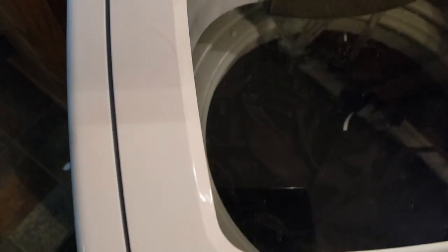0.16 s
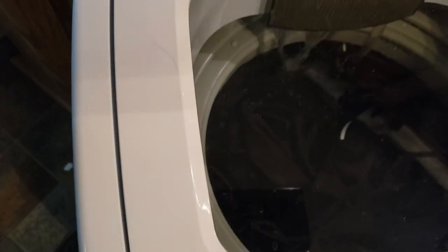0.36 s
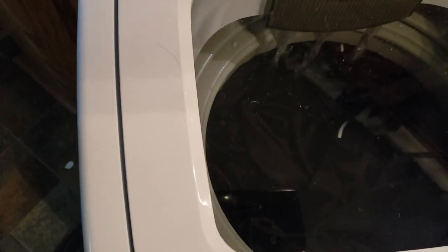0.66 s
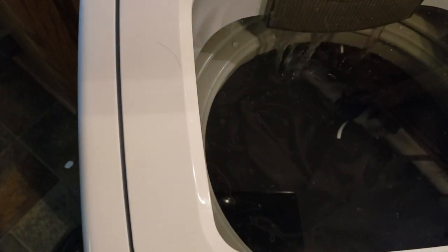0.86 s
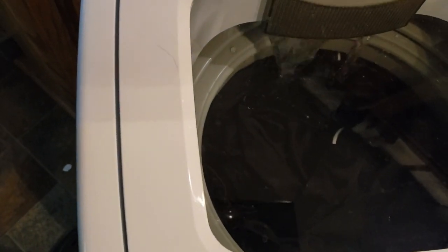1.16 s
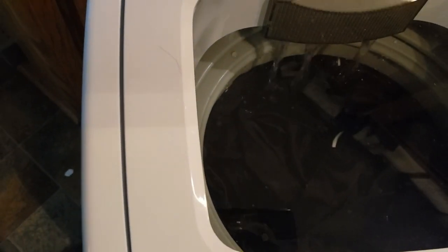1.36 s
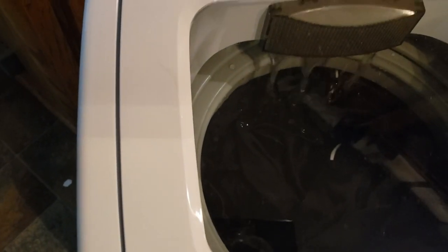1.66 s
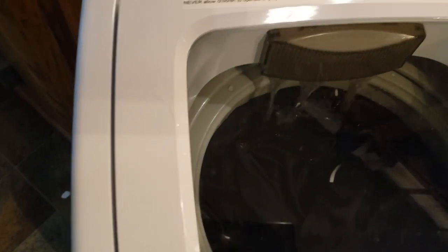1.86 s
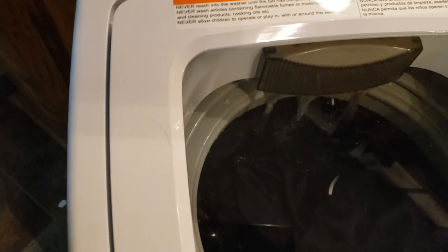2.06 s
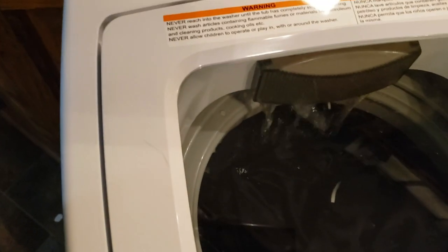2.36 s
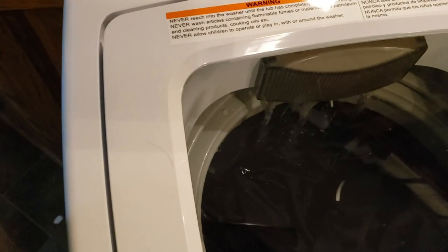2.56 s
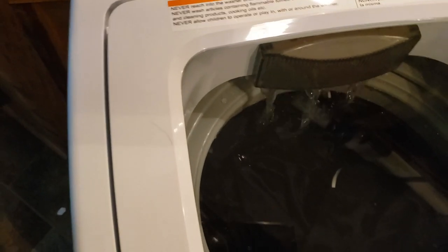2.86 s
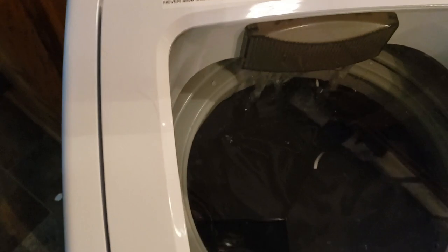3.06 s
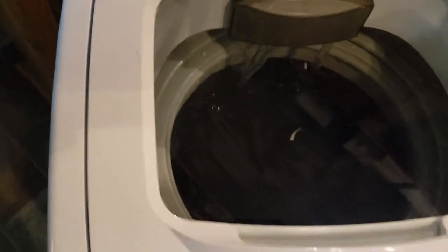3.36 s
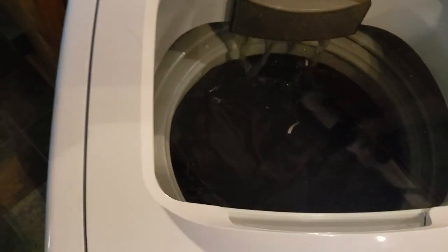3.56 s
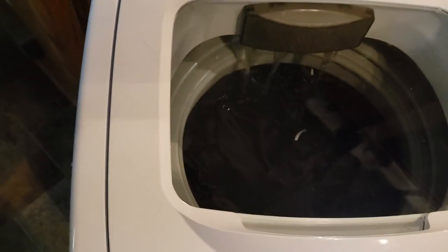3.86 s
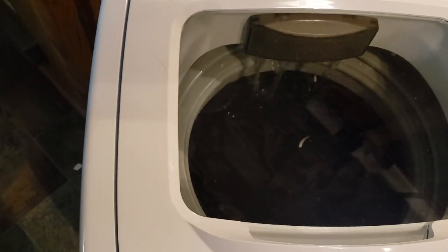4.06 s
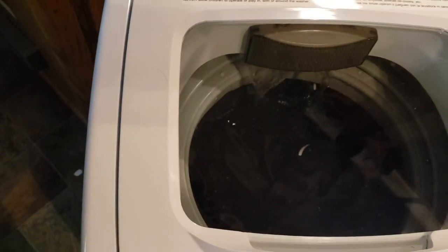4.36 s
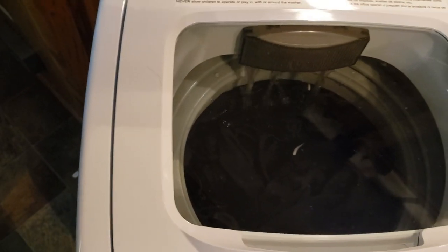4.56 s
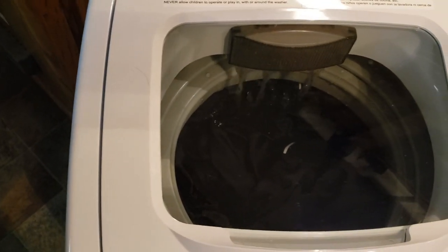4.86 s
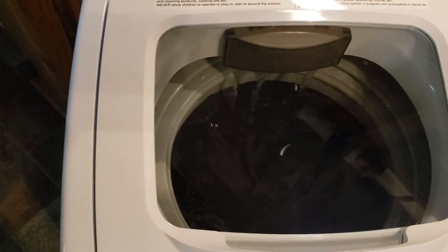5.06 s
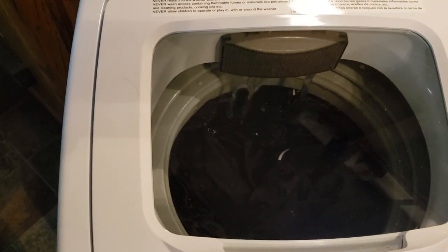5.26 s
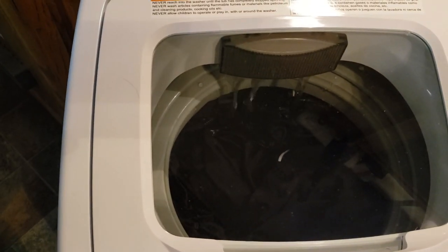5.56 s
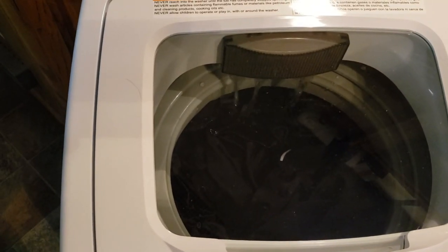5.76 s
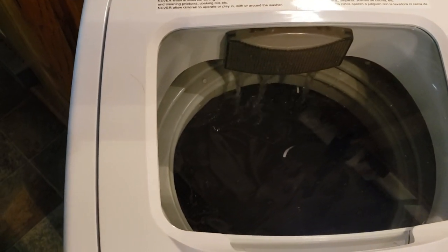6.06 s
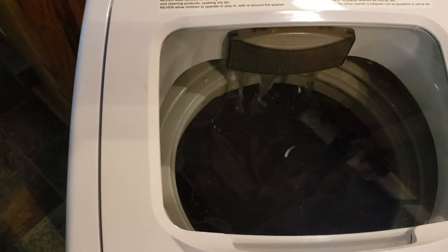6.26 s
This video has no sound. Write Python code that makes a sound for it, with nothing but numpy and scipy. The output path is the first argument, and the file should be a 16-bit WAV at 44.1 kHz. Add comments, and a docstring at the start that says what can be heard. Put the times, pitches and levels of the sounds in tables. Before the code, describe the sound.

A washer tub fills with a continuous gurgling splash and fine spray, scattered drop plinks and a few hissing spurts, above a deep steady hum.

```python
"""A small top-loading washing machine fills in a camper, over the steady hum and rumble of a six-bladed fan.
From the start, thin streams plunge into the half-full tub: a dense wash of bubbles, coloured by the tub.
Fine spray patters around them, and drops plink (a ringing bubble) or tick (a bright click on plastic).
Between about 0.7 and 4 s the inlet spurts several times, the last and strongest made of overlapping swells;
hiss and splash are filtered random clicks. From 3.0 to 3.7 s the microphone moves to face the tub."""
import sys
import numpy as np
from scipy import signal
from scipy.fft import rfft, irfft
from scipy.io import wavfile

SR = 44100
rng = np.random.default_rng(int(sys.argv[2]) if len(sys.argv) > 2 else 0)


def master_out(mix):
    """Clip the mix to full scale and print it as 16-bit PCM to the path in sys.argv[1]."""
    frames = np.transpose(np.atleast_2d(mix))
    ceiling = np.clip(frames, -1, 1)
    pcm = np.round(ceiling * 32767).astype(np.int16)
    wavfile.write(sys.argv[1], SR, pcm)


N = 282048
T = np.arange(N) / SR  # time of every sample [s]

# swells of the inlet's spurts, levels before SPURT_DB:
# (time of crest [s], swell [s], fade [s], hiss of the spray [dB], splash on the water [dB])
SPURT_SWELLS = [(0.79, 0.1, .03, -56, -67), (1.367, .008, 0.06, -53, -46), (1.63, 0.17, 0.21, -54.5, -52),
                (2.53, 0.31, 0.16, -56, -52), (2.90, 0.12, .15, -56, -69), (3.59, 0.16, .05, -52.5, -57),
                (3.705, 0.13, 0.12, -46.5, -43.5), (3.793, 0.14, 0.069, -41, -42.5)]
# drops that trap a ringing bubble, before PLINK_DB: (time [s], relative level [dB], starting pitch [Hz])
PLINK_EVENTS = [(0.136, -34.5, 5640), (0.4768, -40, 4690), (1.251, -37, 5260), (1.2665, -32.5, 6500),
                (1.366, -34, 4430), (1.871, -40, 5080), (1.8974, -37, 6000), (1.905, -31, 4700),
                (1.9954, -37, 6700), (2.8197, -40, 5740), (2.9636, -36.5, 5300), (3.2365, -39, 4500),
                (3.3473, -32.5, 4500), (3.5072, -33, 4460), (3.5843, -35, 6370), (3.8884, -36, 4620),
                (4.578, -36, 4400), (4.9716, -41, 3960), (5.3388, -35.5, 6300), (5.576, -38, 6800),
                (5.65, -37, 6000), (5.8455, -34, 6600), (6.112, -30.5, 3770), (6.2, -38, 4360),
                (6.3844, -39, 5060)]
# drops that hit the plastic, before TICK_DB: (time [s], relative level [dB], pitch [Hz])
TICK_EVENTS = [(0.4993, -42, 10700), (0.6858, -44, 9360), (0.7552, -44, 12100), (1.7759, -42, 12200),
               (2.3984, -44, 11400), (3.9998, -42, 14500), (4.809, -42, 9650), (5.3078, -44, 9120),
               (5.337, -30, 13600), (5.4061, -42, 12100), (5.5174, -38, 12500), (5.8845, -43, 12300),
               (6.1255, -41, 12800)]
# where the microphone is: (time [s], position [0 at the rim .. 1 facing the tub])
MIC_POSITION = [(0, 0.37), (3.0, 0.082), (3.7, 1), (6.4, 1)]
# air resonances of the tub: (pitch [Hz], width [Hz], gain at the rim [dB], gain facing the tub [dB])
TUB_RESONANCES = [(288, 24, 0, -4.5), (463, 40, -2.5, 2.5), (484, 23, 2.5, 3), (559, 91, -5, -5),
                  (621, 15, -8, 3.5), (719, 16, -2.5, 4.5), (776.6, 28, 9.5, 4), (837, 28, 6.5, -8),
                  (976, 57, 1, 3.5), (1020, 32, 6, 0.5), (1130, 29, -1, 3), (1310, 48, 5.5, -1.5),
                  (1570, 120, 4, 5.5), (1760, 50, 1, -6), (1840, 37, 4, 3), (1935, 30, 5.5, 3),
                  (2120, 63, 3.5, 2), (2460, 87, -3, 0.5), (2960, 110, 0, 2), (3220, 77, 1, 0)]
# spectrum of the plunging water: (frequency [Hz], relative level [dB per Hz])
WASH_SPECTRUM = [(150, -4.5), (300, 3.5), (450, 1.5), (800, -3), (1200, -7), (2000, -11), (3000, -13.5),
                 (4500, -25.5), (7000, -26.5), (16000, -43)]
# spectrum of the fine spray: (frequency [Hz], relative level [dB per Hz])
SPRAY_SPECTRUM = [(800, -26), (2000, 6), (3500, -0.5), (5000, -2), (7000, 0), (10000, -8), (13000, -6.5),
                  (16000, -6)]
# spectrum of a spurt's hiss: (frequency [Hz], relative level [dB per Hz])
HISS_SPECTRUM = [(1000, -32), (2000, -17), (3200, -2), (5000, -5.5), (7000, 4), (10000, 0.5), (13000, -0.5),
                 (16000, -1.5)]
# spectrum of a spurt's splash: (frequency [Hz], relative level [dB per Hz])
SPLASH_SPECTRUM = [(500, -24), (1150, -1.5), (1700, -3), (2400, -1), (3300, -4.5), (4400, -6),
                   (7000, -10.5), (16000, -26)]
# spectrum of the fan's rumble: (frequency [Hz], relative level [dB per Hz])
RUMBLE_SPECTRUM = [(18, -37), (38, -7.5), (50, -2.5), (62, 5.5), (80, 7), (96, -0.5), (112, 5.5),
                   (130, -4.5), (150, 1), (168, -2), (184, 2.5), (200, -2), (238, -1.5), (285, -14.5),
                   (600, -51.5)]
# colour of the left microphone port: (frequency [Hz], gain [dB])
LEFT_PORT_COLOUR = [(500, -0.5), (1500, 2), (3000, 1.5), (4600, 4), (6000, 6), (6800, 5.5), (7400, -3.5),
                    (8200, -10.5), (9500, -3), (11200, 0.5), (16000, 2.5)]
# colour of the right microphone port: (frequency [Hz], gain [dB])
RIGHT_PORT_COLOUR = [(500, 0), (1500, -1), (3000, -2), (4600, -1), (6000, -7), (7200, -4.5), (8200, -8.5),
                     (9500, -6.5), (11800, -1.5), (13500, -1.5), (16000, -8)]
# how alike the wash is in the two channels: (frequency [Hz], likeness [-1..1])
CHANNEL_LIKENESS = [(200, 1), (450, 0.96), (750, 1), (1000, 0.42), (1500, 0.29), (2200, -0.023),
                    (3200, -0.45), (8000, 0.5), (16000, 0)]

# fan: tones and rumble
BLADES, BLADE_HZ = 6, 166.95
HUM_DB, SHAFT_DB, RUMBLE_DB = -35.0, -51.5, -37.2
THROB_DB, THROB_PER_S = 1.6, 7  # the blade tone's level wavers a little
BOOM_HZ, BOOM_WIDTH_HZ, BOOM_DB = 162, 14, -42.5  # just under the hum, so the two beat and the hum throbs
# water: levels before the tub and the microphone colour them
WASH_DB, GURGLE_DB = -44.5, -53.5
SPRAY_DB, DRIP_DB, FIZZ_DB = -54, -65.5, -63
WASH_FACING_DB, SPRAY_FACING_DB = 0.83, -0.7  # change when the microphone faces the tub
SPURT_DB, PLINK_DB, TICK_DB = 1.5, -1.5, 5.5  # added to the levels in the event tables
SPURT_RANGE_DB = 20  # climb during a spurt's swell, and fall during its fade
SLAP_DB = -1  # a large drop's slap, relative to its bubble
# reflections: time to die away by 60 dB, and their level relative to the direct sound
DROP_T60_S, DROP_WET_DB = .05, -2
ROOM_T60_S, ROOM_DB = 0.078, -12
# microphone
RIGHT_LAG_S, CUTOFF_HZ = 0.000098, 15900


def from_db(db):
    """Turn decibels into a gain."""
    return 10 ** (np.asarray(db) / 20)


def rms_one(x):
    """Scale to an average power of 1."""
    return x / np.sqrt(np.mean(x ** 2) + 1e-20)


def at_hz(points, hz):
    """Read a curve on a log-frequency axis, as pitch is heard."""
    f, value = np.transpose(points)
    return np.interp(np.log(np.maximum(hz, 1)), np.log(f), value)


def drift(rate):
    """Slow random wandering of spread 1, changing about rate times a second."""
    r = np.exp(-80 * np.pi * rate / SR)
    noise = rng.standard_normal(N // 40 + 2002)  # one value for every 40 samples
    slow = signal.lfilter([1], [1, -2 * r, r * r], noise)[2000:]  # skip the filter's start
    return np.interp(np.arange(N) / 40, np.arange(len(slow)), rms_one(slow))


def coloured(x, points, size=8192):
    """Give a sound the listed spectrum, with no sound ahead of its cause (minimum phase)."""
    gains = from_db(at_hz(points, np.fft.rfftfreq(size, 1 / SR)))
    cepstrum = irfft(np.log(gains))
    cepstrum[1:size // 2] *= 2
    cepstrum[size // 2 + 1:] = 0
    response = irfft(np.exp(rfft(cepstrum)))
    return signal.oaconvolve(np.atleast_2d(x), response[None], axes=1)[:, :N]


def resonance(x, hz, width_hz):
    """Ring at one pitch: a two-pole band-pass with gain 1 on top."""
    r = np.exp(-np.pi * width_hz / SR)
    top = np.array([1, 0, -1]) * (1 - r * r) / 2
    return signal.lfilter(top, [1, -2 * r * np.cos(2 * np.pi * hz / SR), r * r], x + 1e-18)


def add(out, s, sound):
    """Mix a short sound in at time s."""
    i = int(np.clip(s * SR, 0, N - 1))
    out[..., i:i + sound.shape[-1]] += sound[..., :N - i]


def impacts(per_s, spread_db, count=12000):
    """Random clicks like landing droplets, many small and a few large."""
    used = int(np.clip(per_s * N / SR, 1, count))
    when, size, sign = rng.random((count, 3))[:used].T
    clicks = np.zeros(N)
    gain = from_db(-spread_db * np.log(np.maximum(size, .007)))
    clicks[(when * N).astype(int)] = gain * np.sign(sign - .5)
    return clicks


def scattered(x, t60, wet_db, size=4096):
    """Direct sound plus dense reflections, drawn at random and different at each port."""
    t = np.arange(size) / SR
    echoes = rng.standard_normal((2, size)) * from_db(-60 * t / t60) * (t > .0005)
    response = from_db(wet_db) * echoes / np.sqrt(np.sum(echoes ** 2, axis=1, keepdims=True))
    response[:, 0] = 1  # the direct sound
    return signal.oaconvolve(x[None], response, axes=1)[:, :len(x)]


def bubble(hz, cycles, rise, onset_cycles=0.72, size=2048):
    """A damped sine that swells as the bubble pinches off; rise lifts its pitch as it nears the surface."""
    turns = np.arange(size) / SR * hz
    age = turns / cycles  # at age 1 it has decayed by 60 dB
    level = from_db(-60 * age) * (1 - np.exp(-(turns / onset_cycles) ** 2))
    pitch = hz * (1 + rise * np.minimum(age, 1))
    return level / level.max() * np.sin(2 * np.pi * np.cumsum(pitch) / SR)


def facing():
    """How far the microphone has moved from the rim towards the tub, 0..1."""
    return np.interp(T, *np.transpose(MIC_POSITION))


def fan(side_db):
    """Steady shaft and blade-passing tones over the rumble of moved air and the cabinet's boom."""
    turns = T * BLADE_HZ / BLADES
    shaft = from_db(SHAFT_DB) * np.sin(2 * np.pi * turns)
    hum_gain = from_db(HUM_DB + THROB_DB * drift(THROB_PER_S))
    blades = hum_gain * np.sin(2 * np.pi * BLADES * turns)
    mid, side = coloured(rng.standard_normal((2, N)), RUMBLE_SPECTRUM)
    side = signal.sosfilt(signal.butter(1, 110, fs=SR, output="sos"), side)
    shared = rms_one(mid) * from_db([[-.9], [.9]])
    opposed = from_db(side_db) * rms_one(side) * [[1], [-1]]  # opposite sign in the two channels
    boom_noise = coloured(rng.standard_normal(N), RUMBLE_SPECTRUM)[0]
    boom = rms_one(resonance(boom_noise, BOOM_HZ, BOOM_WIDTH_HZ))
    tones = np.sqrt(2) * (shaft + blades)
    return tones + from_db(RUMBLE_DB) * (shared + opposed) + from_db(BOOM_DB) * boom


def small_room(x):
    """A small room's reflections of the water, drawn at random, ripple its spectrum above the bass."""
    bright = signal.sosfilt(signal.butter(2, 900, "high", fs=SR, output="sos"), x)
    # take the direct sound away, so that only reflections are added
    return x + np.array([scattered(port, ROOM_T60_S, ROOM_DB)[0] - port for port in bright])


def tub(x):
    """The air in the tub rings; which resonances stand out depends on where one listens."""
    view = facing()
    out = x.copy()
    for hz, width_hz, rim_db, facing_db in TUB_RESONANCES:
        gain = from_db(rim_db) * (1 - view) + from_db(facing_db) * view
        out += (gain - 1) * resonance(x, hz, width_hz)
    return out


def ticks(cycles):
    """Drops on hard plastic: bright clicks that hardly ring."""
    out = np.zeros((2, N))
    for s, db, hz in TICK_EVENTS:
        click = bubble(hz, cycles, rise=0, onset_cycles=0.52)
        add(out, s, from_db(db + TICK_DB) * scattered(click, t60=0.022, wet_db=7))
    return out


def plinks(cycles, rise):
    """Large drops: each slaps the surface and leaves one bubble ringing in the tub."""
    out = np.zeros((2, N))
    for s, db, hz in PLINK_EVENTS:
        slap = from_db(SLAP_DB) * bubble(hz, cycles=4, rise=0, onset_cycles=.4)
        drop = slap + bubble(hz, cycles, rise, onset_cycles=1.65)
        add(out, s, from_db(db + PLINK_DB) * scattered(drop, DROP_T60_S, DROP_WET_DB))
    return out


def spray(spectrum, per_s, spread_db, flutter_db, count=14):
    """Fine droplets patter down in many places, each with its own reflections."""
    patter = np.zeros((2, N))
    for _ in range(count):
        patter += scattered(impacts(per_s / count, spread_db), t60=0.038, wet_db=16.5, size=1024)
    return rms_one(coloured(patter, spectrum)) * from_db(flutter_db * drift(30))


def swell(crest_s, swell_s, fade_s, roundness=1.6):
    """Gain of one swell, which climbs to 1 at the crest and sinks again."""
    away = np.maximum((crest_s - T) / swell_s, (T - crest_s) / fade_s)
    return from_db(-SPURT_RANGE_DB * np.minimum(away, 10) ** roundness)


def spurts():
    """The inlet spits: a dense hiss of spray and a lower splash where it lands; overlaps add in power."""
    power = np.zeros((2, N))
    for s, swell_s, fade_s, hiss_db, splash_db in SPURT_SWELLS:
        power += (from_db([[hiss_db], [splash_db]]) * swell(s, swell_s, fade_s)) ** 2
    hiss_gain, splash_gain = np.sqrt(power)
    hiss = hiss_gain * spray(HISS_SPECTRUM, per_s=9000, spread_db=3.8, flutter_db=0.6)
    splash = splash_gain * spray(SPLASH_SPECTRUM, per_s=6000, spread_db=1.5, flutter_db=1.0)
    return from_db(SPURT_DB) * (hiss + splash)


def drips(low_hz, high_hz, spread_db, cycles, rise, count):
    """Single bubbles ring at random times and pitches, each with its own reflections."""
    out = np.zeros((2, N))
    for when, size, pitch in rng.random((count, 3)):
        ring = bubble(low_hz * (high_hz / low_hz) ** pitch, cycles, rise, onset_cycles=1.66)
        gain = from_db(-spread_db * np.log(max(size, .04)))
        add(out, when * N / SR, gain * scattered(ring, t60=0.049, wet_db=5.0, size=2048))
    return rms_one(out)


def surface():
    """Around the streams: fine spray, small drips and the fizz of the smallest bubbles bursting."""
    patter = spray(SPRAY_SPECTRUM, per_s=9000, spread_db=2.5, flutter_db=0.46)
    small = drips(2620, 7660, spread_db=5.5, cycles=12, rise=0.34, count=520)
    fizz = drips(6400, 15500, spread_db=1.5, cycles=33, rise=0.044, count=1400)
    return from_db(SPRAY_DB) * patter + from_db(DRIP_DB) * small + from_db(FIZZ_DB) * fizz


def wash(per_s, spread_db, cycles, churn_db, count=36):
    """Plunging streams trap bubbles of all sizes; long waves reach both ports alike."""
    out = np.zeros((2, N))
    for hz in np.geomspace(200, 7000, count):
        clicks = np.zeros((2, N))
        used = int(np.clip(per_s * N / SR, 1, 12000))
        when, size, sign, turn = rng.random((12000, 4))[:used].T
        kicks = from_db(-spread_db * np.log(np.maximum(size, .01))) * np.sign(sign - .5)
        # the angle between the channels sets how alike they are
        apart = np.arccos(np.clip(at_hz(CHANNEL_LIKENESS, hz), -1, 1)) / 2
        place = 2 * np.pi * turn
        clicks[:, (when * N).astype(int)] = kicks * np.cos([place - apart, place + apart])
        width_hz = np.log(1000) / np.pi * hz / cycles  # decays by 60 dB in the given cycles
        ringing = rms_one(resonance(clicks, hz, width_hz))
        out += np.sqrt(hz) * ringing * from_db(churn_db * drift(7.7))
    return rms_one(coloured(out, WASH_SPECTRUM))


def plunge():
    """Where the streams enter the water: a dense wash of bubbles and single gurgles."""
    dense = wash(per_s=700, spread_db=1.5, cycles=15, churn_db=0.15)
    bubbles = drips(409.2, 3014, spread_db=1.5, cycles=63, rise=0.097, count=900)
    gurgles = rms_one(coloured(bubbles, WASH_SPECTRUM))
    return from_db(WASH_DB) * dense + from_db(GURGLE_DB) * gurgles


def scene():
    """Water in the tub over the fan, through two ports of unlike colour; sound reaches the left one first."""
    view = facing()
    water = from_db(WASH_FACING_DB * view) * plunge() + from_db(SPRAY_FACING_DB * view) * surface()
    in_tub = tub(small_room(water + spurts()))
    left, right = in_tub + plinks(cycles=20, rise=0.04) + ticks(cycles=3.8)
    ports = np.vstack([coloured(left, LEFT_PORT_COLOUR), coloured(right, RIGHT_PORT_COLOUR)])
    left, right = ports + fan(side_db=-18.0)
    lag = int(np.clip(RIGHT_LAG_S * SR, 0, N))
    return np.array([left, np.pad(right, (lag, 0))[:N]])


def record(dry):
    """A steep low-pass filter removes the highest treble."""
    return signal.sosfilt(signal.ellip(12, .1, 80, CUTOFF_HZ, fs=SR, output="sos"), dry)


dry = scene()
out = record(dry)
master_out(out)
```